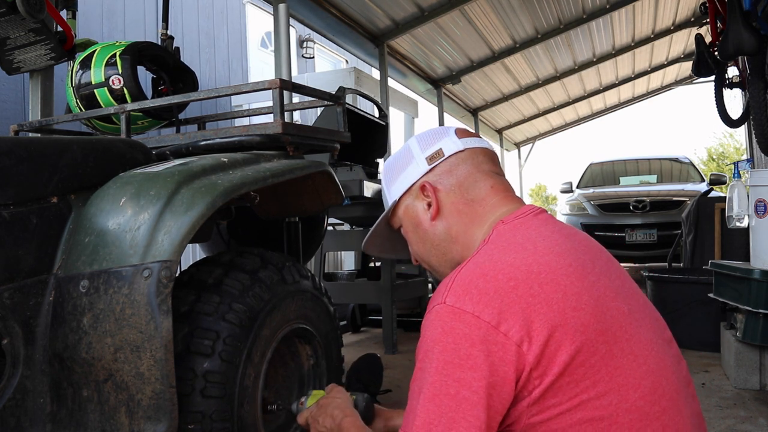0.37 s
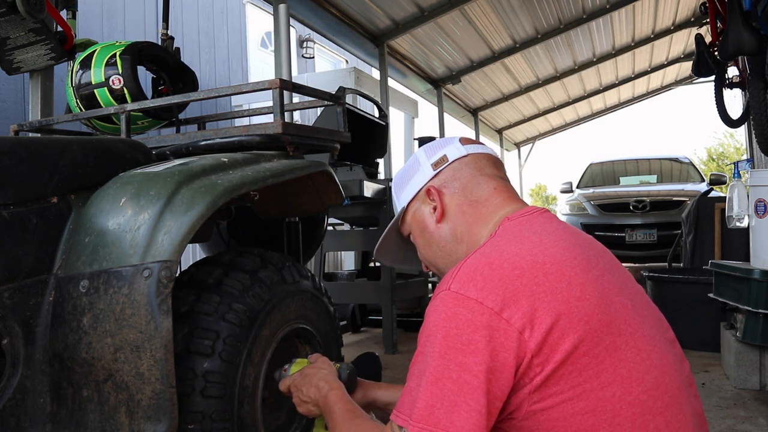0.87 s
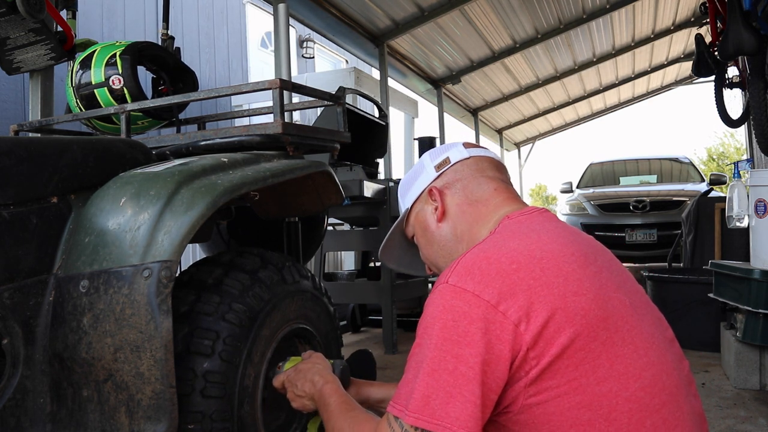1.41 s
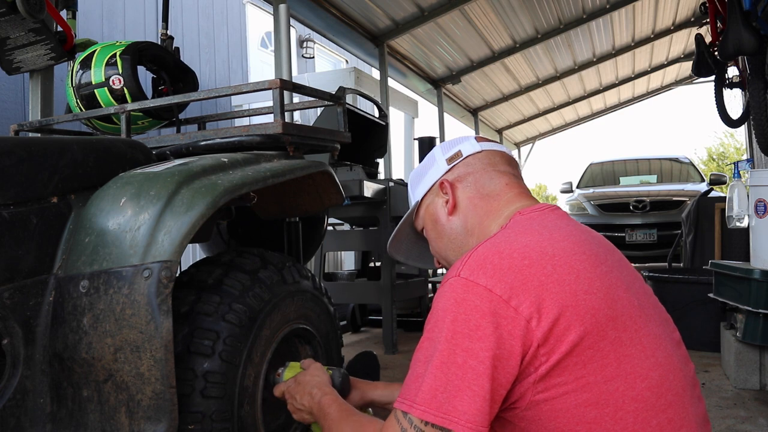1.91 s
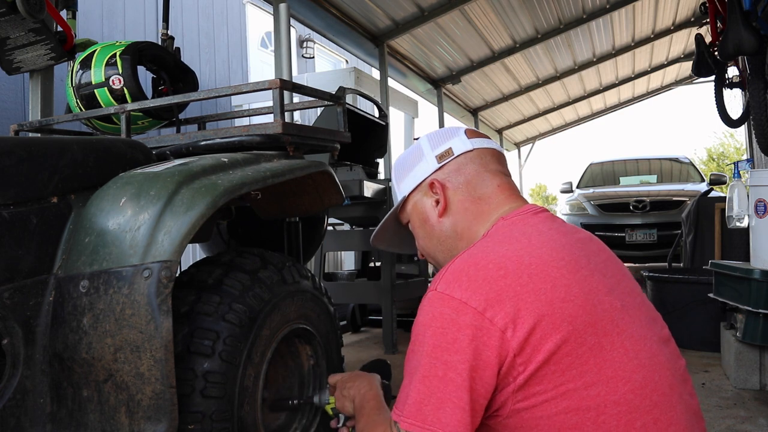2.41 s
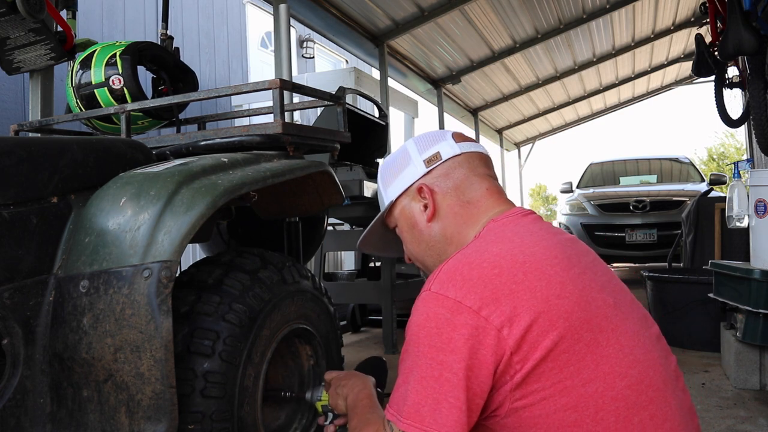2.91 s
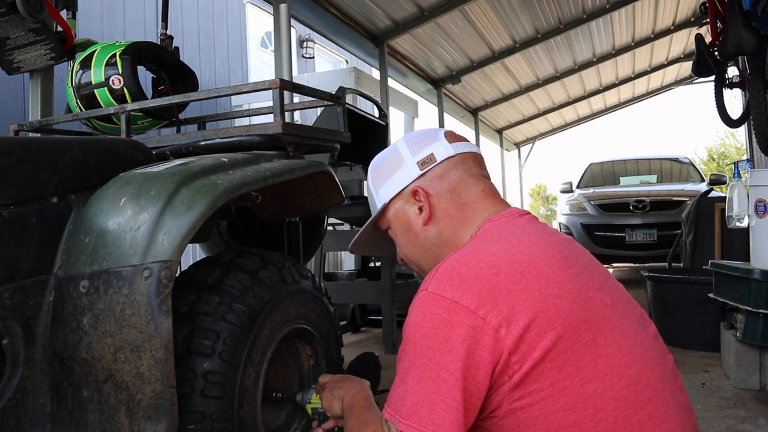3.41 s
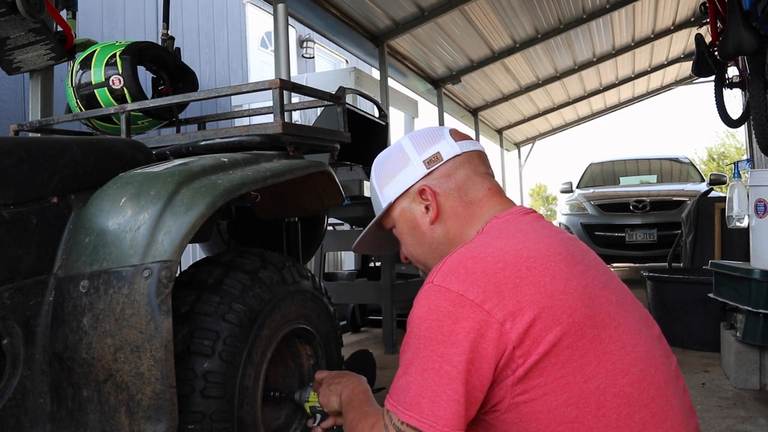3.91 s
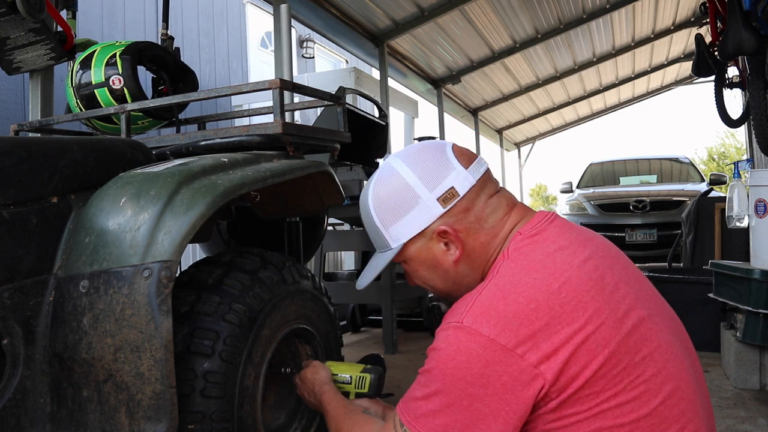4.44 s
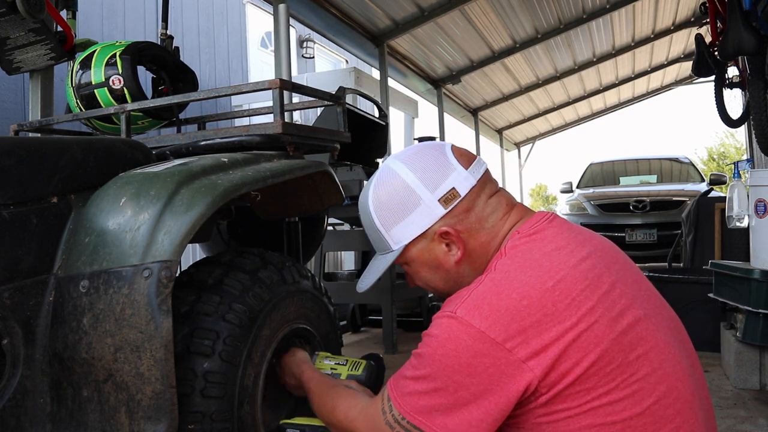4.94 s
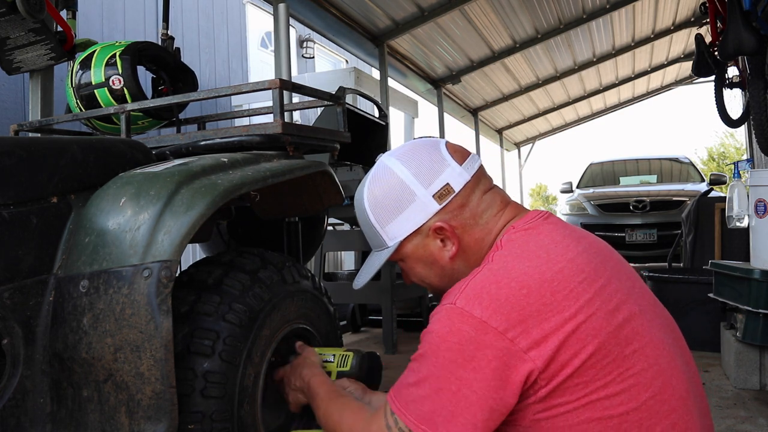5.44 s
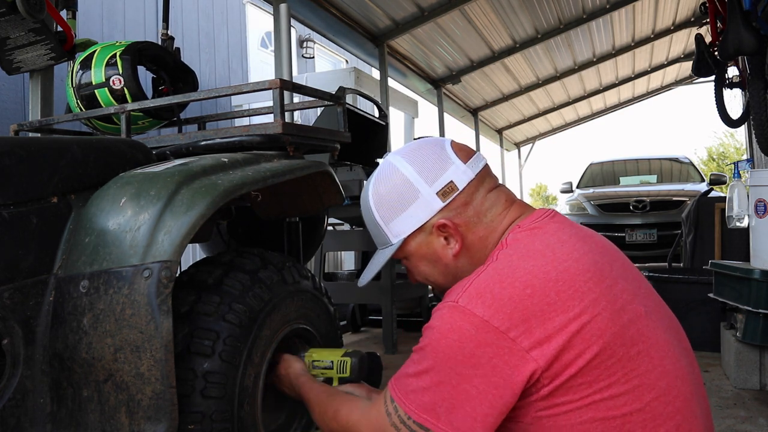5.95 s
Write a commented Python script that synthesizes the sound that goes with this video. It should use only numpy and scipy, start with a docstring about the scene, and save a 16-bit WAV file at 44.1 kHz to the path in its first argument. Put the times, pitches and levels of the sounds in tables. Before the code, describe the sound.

Wheel nuts being tightened under an open carport, heard from close range in stereo. Gear rattle and whirring swell quickly, break into dense steel-on-steel hammering, then stop sharply with a brief coast-down. Between groups of bursts come loose socket taps on nut and rim. Wind softly rumbles at the microphone, with dim far machinery noise and a short roof reverberation.

```python
"""A cordless impact wrench tightens wheel nuts under a sheet-metal carport, close by.
It opens on a short burst of hammer blows over rattling gears; steel socket clicks follow. Three pulls run from
1 s to 1.9 s, three more from 3 s to 4 s and a last one at 5.5 s, with socket clicks between the groups.
Each blow is a short note, ringing modes and noise; the gears are random tooth contacts in three colours.
Beneath lie far machine tones and noise and gusts of filtered wind rumble; the roof echoes in decaying noise."""
import sys
import numpy as np
from scipy import signal
from scipy.fft import rfft, irfft, next_fast_len
from scipy.io import wavfile
from scipy.ndimage import map_coordinates

SR = 44100
rng = np.random.default_rng(int(sys.argv[2]) if len(sys.argv) > 2 else 0)


def field_ratio(decibels):
    """Amplitude ratio for a level in dB (20 dB per decade); scalars and array-likes work."""
    return 10 ** (np.asarray(decibels, dtype=float) / 20)


def master_out(mix):
    """Clip the mix to full scale and print it as 16-bit PCM to the path in sys.argv[1]."""
    frames = np.transpose(np.atleast_2d(mix))
    ceiling = np.clip(frames, -1, 1)
    pcm = np.round(ceiling * 32767).astype(np.int16)
    wavfile.write(sys.argv[1], SR, pcm)


N = 268117  # length in samples


def unit(x):
    """Scale to rms 1."""
    return x / np.sqrt(np.mean(x ** 2) + 1e-20)


def along(points, hz):
    """Read a curve of (Hz, value) points on a log frequency axis."""
    f, v = np.transpose(points)
    return np.interp(np.log(hz + 1), np.log(f + 1), v)


def gain(rows):
    """Gain per sample from (s, dB) points, practically silent outside them."""
    s, db = np.transpose(rows)
    return field_ratio(np.interp(np.arange(N) / SR, s, db, left=-150, right=-150))


def wobble(rate):
    """A smooth random curve with rate knots a second."""
    knots = rng.standard_normal(int(N * rate / SR) + 4)
    return map_coordinates(knots, [np.arange(N) * rate / SR])


def filtered(x, response):
    """Multiply the spectrum of x by a complex response of frequency."""
    m = next_fast_len(x.shape[-1] + 8192)
    return irfft(rfft(x, m) * response(np.fft.rfftfreq(m, 1 / SR)), m)[..., :x.shape[-1]]


# How alike left and right are. Each row: frequency in Hz, likeness from 0 to 1.
LIKENESS = [(40, .978), (200, 1), (1000, 0.96), (2000, 0.95), (3500, 0.67), (5500, 0), (12000, 0)]


def spread(pair, spectrum=((1, 0),)):
    """Colour two unrelated signals by (Hz, dB) and turn them into left and right, alike mostly in the bass."""
    def response(hz):
        angle = np.arccos(np.clip(along(LIKENESS, hz), -1, 1)) / 2
        return field_ratio(along(spectrum, hz)) * [np.cos(angle), np.sin(angle)]

    mid, side = filtered(pair, response)
    return np.array([mid + side, mid - side])


# Low rumble of gusts at the microphones. Each row: time in seconds, level in dB before the flutter.
GUSTS = [(0.0, -58), (0.36, -57), (1.34, -46), (1.44, -45), (1.56, -60.5), (2.05, -61.5), (2.25, -58.5),
         (2.88, -52.5), (3.15, -48), (3.49, -44), (3.81, -53.5), (4.0, -61.5), (4.49, -61), (4.67, -55.5),
         (5.4, -53), (5.55, -49), (5.7, -69), (6.08, -56)]
# Colour of that rumble. Each row: frequency in Hz, relative level in dB per Hz.
RUMBLE_COLOUR = [(12, -46.5), (20, -23), (64, -1.5), (172, -9.5), (195, -16.5), (231, -2), (300, -22),
                 (390, -52), (660, -120)]


def wind():
    """Wind stirring the microphones: low noise that swells in gusts and flutters."""
    rumble = unit(spread(rng.standard_normal((2, N)), RUMBLE_COLOUR))
    return gain(GUSTS) * rumble * field_ratio(1.2 * wobble(12))


# Level at which the yard noise is heard: low after bursts, then rising again.
# Each row: time in seconds, level in dB before wavering.
YARD_LEVEL = [(0, -43), (.36, -58), (.62, -58), (.97, -47), (1.98, -66), (2.6, -55.5), (2.88, -49),
              (4.1, -62.5), (4.6, -59), (4.9, -55.5), (5.5, -47.5), (5.95, -60), (6.08, -65)]
# Colour of the far noise. Each row: frequency in Hz, relative level in dB per Hz.
FAR_COLOUR = [(100, -47.5), (170, -13), (236, -10.5), (320, -10), (515, -16), (740, -19.5), (1020, -18.5),
              (1500, -23), (2080, -23.5), (2700, -27), (3050, -31), (5300, -33.5), (5700, -40.5),
              (9300, -42.5), (11500, -66.5), (14000, -101)]
# Tones of far machinery. Each row: frequency in Hz, peak level in dB over the noise's rms before wavering.
MACHINE_TONES = [(54, -13), (231.5, -4), (1868, -21), (2099, -9.5), (2277, -19), (2627, -14)]


def far_yard():
    """Traffic-like noise and machine tones that waver in level, the tones also in phase."""
    t = np.arange(N) / SR
    rush = unit(spread(rng.standard_normal((2, N)), FAR_COLOUR)) * field_ratio(.9 * wobble(14))
    tones = np.zeros(N)
    for hz, db in MACHINE_TONES:
        level = field_ratio(db + 1.8 * wobble(10))
        tones += level * np.sin(2 * np.pi * hz * t + 1.9 * wobble(30))
    return gain(YARD_LEVEL) * (rush + tones)


# How long the echoes last. Each row: frequency in Hz, time to fall 60 dB in seconds.
ROOF_DECAY = [(200, 0.27), (2000, 0.17), (6000, 0.36), (13000, 0.21)]


def roof(x):
    """Roof, wall and slab answer in decaying noise; each third of a second gets a fresh random tail."""
    step, out = SR // 3, np.zeros((2, N + 2 * SR))
    fade = np.hanning(2 * step + 1)[:-1]  # overlapping fades sum to 1
    x = np.pad(x, (step, 2 * step))
    for at in range(0, N + step, step):
        hz, t, z = signal.stft(rng.standard_normal((2, step)), SR, nperseg=256)
        decay = field_ratio(-60 * t / along(ROOF_DECAY, hz)[:, None])
        tail = signal.istft(z * decay, SR, nperseg=256)[1][:, :step]
        tail = tail / np.linalg.norm(tail[0])
        wet = signal.fftconvolve((x[at:][:2 * step] * fade)[None], tail, axes=1)
        out[:, at:at + wet.shape[1]] += wet
    late = step - round(.004 * SR)  # drop the padding, but hold the echoes back by 4 ms
    return spread(out[:, late:late + N])


# Trigger pulls. Each row: press in seconds, let go in seconds, spin-up in seconds before each part's stretch,
# relative level in dB early on, relative level in dB at let-go.
TRIGGER_PULLS = [(0.002, 0.188, 0.0098, -26, -23), (0.99, 1.157, 0.0054, -30.5, -31.5),
                 (1.223, 1.559, 0.029, -25, -22), (1.717, 1.9, 0.016, -26, -28),
                 (3.054, 3.225, .02, -27.5, -27), (3.313, 3.643, 0.024, -22.5, -23),
                 (3.768, 3.989, 0.0083, -20, -29), (5.52, 5.869, .012, -21, -23.5)]


def running(seating_db, over_db, stretch, brake_t60, coast_db, coast_t60, swell_db):
    """Gain of one part of the tool: spin up, hold under load, brake, coast."""
    t, out = np.arange(N) / SR, np.zeros(N)
    for (press, stop, spin, early_db, late_db), seat_db in zip(TRIGGER_PULLS, seating_db):
        held, after = np.clip(t - press, 0, stop - press), np.clip(t - stop, 0, None)
        change_db = late_db - early_db + swell_db
        load_db = early_db + over_db + seat_db + change_db * held / (stop - press)
        spin_up = (1 - np.exp(-held / (spin * stretch))) ** 2
        fall = field_ratio(-60 * after / brake_t60) + field_ratio(coast_db - 60 * after / coast_t60)
        out += field_ratio(load_db) * spin_up * fall
    return out


def chatter(per_second, scatter_db, smooth):
    """Random tooth contacts of uneven strength over a smooth rush, as two unrelated signals."""
    teeth = (rng.random(N) < per_second / SR) * field_ratio(scatter_db * rng.standard_normal(N))
    return unit(teeth * rng.standard_normal((2, N))) + smooth * rng.standard_normal((2, N))


# How the tool is held and seated in each pull. Each row: case drone in dB, hiss in dB, both over their usual level.
SEATING_LEVELS = [(-3.5, 0.5), (-3, -2), (1, -2), (3.5, 3.5), (0, -4), (2.5, -3), (0, 2), (1.5, 2)]
# Colour of the gear rattle. Each row: frequency in Hz, relative level in dB per Hz.
GEAR_COLOUR = [(410, -34), (700, -27.5), (727, -17.5), (1110, -3.5), (1360, -2.5), (1580, -3.5),
               (1930, -3.5), (2330, -1.5), (2970, -5.5), (3320, -5.5), (4520, -13.5), (5290, -26),
               (6500, -30), (8450, -35), (14300, -120)]
# Colour of the case drone. Each row: frequency in Hz, relative level in dB per Hz.
CASE_COLOUR = [(53, -43.5), (90, -16.5), (112, -5), (146, -21.5), (187, -14), (303, -4.5), (330, -6),
               (441, -7.5), (505, -0.5), (612, -5.5), (721, -13.5), (900, -27), (1170, -36.5), (1980, -120)]
# Colour of the hiss. Each row: frequency in Hz, relative level in dB per Hz.
HISS_COLOUR = [(2940, -23.5), (5000, 1), (5340, -3.5), (6050, -2), (6530, -3), (10900, -4.5), (12600, -15),
               (14400, -21), (15600, -45)]


def motor(blow_s):
    """Gears, case and brushes run together; a loose drive makes the rattle and hiss surge."""
    case_db, hiss_db = np.transpose(SEATING_LEVELS)
    gear = running(np.zeros(len(TRIGGER_PULLS)), over_db=-1, stretch=1.5, brake_t60=0.1474,
                   coast_db=-17, coast_t60=0.6756, swell_db=-0.5)
    case = running(case_db, over_db=-11.5, stretch=2, brake_t60=0.16, coast_db=-22.5, coast_t60=1.74, swell_db=-1)
    hiss = running(hiss_db, over_db=-10, stretch=1.4, brake_t60=0.0771, coast_db=-21.5, coast_t60=0.5, swell_db=4)

    # the gears quieten while the hammer flies free before a blow
    slack_db, slack_s = -1.5, 0.005
    t, blow_s = np.arange(N) / SR, np.append(np.sort(blow_s), N)
    until_blow = blow_s[np.searchsorted(blow_s, t)] - t
    surge = field_ratio(1.2 * wobble(70)) * field_ratio(slack_db * np.exp(-(until_blow / slack_s) ** 2))

    teeth = chatter(per_second=2500, scatter_db=1.5, smooth=1.1)
    rattle = gear * surge * unit(spread(teeth, GEAR_COLOUR))
    drone = case * unit(field_ratio(2.2 * wobble(45)) * spread(teeth, CASE_COLOUR))
    return rattle + drone + hiss * surge * unit(spread(teeth, HISS_COLOUR))


def ring(modes, t, damping):
    """Strike decaying sine modes, each at a new random strength, peak 1; damping scales their decay times."""
    hz, db, t60 = np.transpose(modes)[..., None]
    db = db + 4 * rng.standard_normal(hz.shape) - 60 * t / (t60 * damping)
    x = np.sum(field_ratio(db) * np.sin(2 * np.pi * hz * t), axis=0)
    return x / np.max(abs(x))


# Modes of socket and rim. Each row: frequency in Hz, relative level in dB, undamped 60 dB decay in seconds.
STEEL_MODES = [(1016, 4, 0.14), (1315, -14, 0.23), (1820, -14.5, 0.078), (2263, 1.5, 0.11),
               (2472, -16.5, 0.37), (3000, 13, 0.21), (3150, -7.5, 0.82), (3643, 3, 0.31),
               (3780, -10, 0.63), (4510, -5, 0.21)]
# Modes of wheel and tyre. Each row: frequency in Hz, relative level in dB, undamped 60 dB decay in seconds.
WHEEL_MODES = [(317, -16.5, 0.2), (430, -14, 0.076), (513, -4, 0.14), (576, -2.5, 0.093)]


def blows(table, note_db, steel_db, hold, clack_t60, clack_db, crack_t60, knock_db, damping, fizz_db, swell):
    """Each contact: a short note, steel modes, the wheel's slower knock, and grit for clack and treble crack."""
    out, t = np.zeros((5, N + SR)), np.arange(SR // 8) / SR
    for s, db, hz, low_db, high_db in table:
        rise = field_ratio(db) * (1 - np.exp(-t / 0.0006))
        note = field_ratio(note_db - 60 * t / .006) * np.sin(2 * np.pi * hz * t)
        steel = field_ratio(steel_db) * ring(STEEL_MODES, t, hold)
        knock = field_ratio(low_db + knock_db) * ring(WHEEL_MODES, t, damping) * (1 - np.exp(-t / swell))
        grit = rng.standard_normal((2, len(t)))
        clack = field_ratio(clack_db - 60 * t / clack_t60) * grit
        crack = field_ratio(high_db + fizz_db - 60 * t / crack_t60) * grit
        out[:, round(s * SR):][:, :len(t)] += rise * np.array([note + steel + knock, *clack, *crack])
    body, clack, crack = out[0, :N], out[1:3, :N], out[3:, :N]
    return body + spread(clack, GEAR_COLOUR) + spread(crack, HISS_COLOUR)


# Socket touching nut and rim. Each row: start in seconds, relative level in dB, note in Hz,
# wheel knock in relative dB, treble in relative dB.
SOCKET_TOUCHES = [(0.374, -43, 2010, -17, -5), (0.7129, -25.5, 2250, -22, -18.5),
                  (0.7282, -34.5, 2000, -1.5, -16), (0.811, -27, 2300, -19, -8.5),
                  (0.9128, -31.5, 2060, -14, -19.5), (0.9374, -40, 1460, -13, -38),
                  (1.715, -37, 2140, -24, -26), (2.3914, -54.5, 1140, -2.5, -17),
                  (2.7029, -27, 1765, -10, -18.5), (2.796, -41, 1880, -13, -33),
                  (2.8411, -30, 1540, -11, -3), (2.9337, -41, 2100, -3, -36),
                  (3.073, -34.5, 2500, -25, -21), (4.115, -40, 2100, -24, -25.5),
                  (4.13, -39.5, 2510, -26, -28.5), (4.1905, -47.5, 2040, -13, -12),
                  (4.4264, -58, 2110, -12, -18.5), (4.6617, -22.5, 3310, -9.5, -28.5),
                  (5.0668, -30.5, 1620, -0.5, -20), (5.0721, -32.5, 1320, -28, -43),
                  (5.2126, -31.5, 3220, -16, -29), (5.3467, -37.5, 1450, -2, -38),
                  (5.3673, -20, 2470, -1, -29)]


def socket_clicks():
    """Light socket touches, whose steel rattles a little longer than under a hammer blow."""
    return blows(SOCKET_TOUCHES, note_db=12.5, steel_db=-0.5, hold=0.18, clack_t60=0.096, clack_db=7.5,
                 crack_t60=0.099, knock_db=19.5, damping=0.36, fizz_db=6.0, swell=0.0087)


# Hammer blows on the anvil placed by hand, and a faint trigger click at 3.33 s.
# Each row: start in seconds, relative level in dB, note in Hz.
PLACED_STRIKES = [(0.015, -3, 1400), (0.0401, -0.5, 3560), (0.0655, -6.5, 2840), (0.0841, -2.5, 1326),
                  (0.1074, -2.5, 1310), (0.1235, -4.5, 1980), (0.1438, -5, 1350), (0.1847, -10, 2230),
                  (0.193, -4.5, 2160), (1.0019, -16, 1970), (1.109, -11, 1340), (1.4851, 3, 3214),
                  (1.4949, 0.5, 2657), (1.5098, -0.5, 2060), (1.547, -1.5, 3340), (1.5698, -6, 1690),
                  (1.7401, -11.5, 3795), (1.7643, -6, 2700), (1.7874, -4.5, 2760), (1.7988, 0.5, 1490),
                  (1.8877, -11, 1570), (3.0953, -10.5, 2460), (3.1525, -0.5, 2720), (3.3312, -20, 1410),
                  (3.5529, -3.5, 2900), (3.5651, 2.5, 3170), (3.5739, -3, 3170), (3.591, -1, 3975),
                  (3.656, -6.5, 2720), (3.7872, -4, 2410), (3.8071, 0.5, 2780), (3.8511, -6.5, 2700),
                  (3.887, -6, 3040), (3.9071, -6.5, 2700), (3.9474, -5, 2510), (3.9676, -7.5, 2930),
                  (3.993, -15.5, 2920), (5.539, -7, 2057), (5.5656, 4, 3494), (5.5718, -1, 2404),
                  (5.5821, -8.5, 3180), (5.6083, -3, 3160), (5.6244, -5.5, 3485), (5.6883, 0.5, 2472),
                  (5.6971, -6, 2380), (5.7277, -1, 4390), (5.7504, -5.5, 2420), (5.83, -5.5, 2260),
                  (5.8669, -11, 2200)]
# Spells when the nut is tight and the hammer keeps its beat. Each row: start in seconds, end in seconds,
# filling blows in relative dB, wheel knock in relative dB, treble in relative dB.
TIGHT_SPELLS = [(0.001, .21, -10, -21, -27.5), (1.47, 1.59, -10.5, -26.5, -22),
                (1.73, 1.9, -12, -20, -22.5), (3.54, 3.67, -14, -23.5, -16.5), (3.775, 4.01, -11, -20, -20),
                (5.55, 5.89, -6, -20, -21.5)]


def hammering():
    """Softer blows fill the beat between the placed strikes; every strike draws its knock and treble."""
    beat_s, soft_scatter_db, soft_hz = .021, 1, 2200
    rows = list(PLACED_STRIKES)
    for (s, *_), (later, *_) in zip(PLACED_STRIKES, PLACED_STRIKES[1:]):
        beats = max(round((later - s) / beat_s), 1)
        for start, end, soft_db, *_ in TIGHT_SPELLS:
            if not (start <= s and later <= end):
                continue
            for at in np.linspace(s, later, beats + 1)[1:-1]:
                slip, size, pitch = rng.standard_normal(3)
                rows.append((at + .0015 * slip, soft_db + soft_scatter_db * size, soft_hz * np.exp(.3 * pitch)))

    s, db, hz = np.transpose(rows)
    low, high = rng.standard_normal((len(s), 2)).T
    spell = [(start <= s) & (s <= end) for start, end, *_ in TIGHT_SPELLS]
    # outside the spells knock and treble sit at fixed levels: -33 and -25.5 dB
    knock_db = np.select(spell, [knock for *_, knock, _ in TIGHT_SPELLS], -33)
    treble_db = np.select(spell, [treble for *_, treble in TIGHT_SPELLS], -25.5)
    # louder strikes gain less knock and treble: 0.6 and 0.17 dB lost per dB
    knock_db = knock_db - .6 * db + 3.5 * low
    treble_db = treble_db - 0.17 * db + 5 * high
    return np.transpose([s, db, hz, knock_db, treble_db])


def hammer_blows(strikes):
    """Hard steel on steel, damped at once by the seated nut."""
    return blows(strikes, note_db=4.0, steel_db=-4.0, hold=.1, clack_t60=0.022, clack_db=3.5,
                 crack_t60=0.032, knock_db=8, damping=0.24, fizz_db=10.5, swell=0.0033)


def scene():
    """Mix tool, echoes and yard; the small tool and the wheel radiate no deep bass."""
    strikes = hammering()
    run = motor(strikes[:, 0])
    hits = hammer_blows(strikes) + socket_clicks()
    echoes = roof(np.mean(field_ratio(-2.5) * run + field_ratio(-4) * hits, axis=0))
    # three first-order high-passes at 90 Hz
    tool = filtered(run + hits + echoes, lambda hz: (1j * hz / (90 + 1j * hz)) ** 3)
    return tool + wind() + far_yard()


def low_pass(x):
    """Removes everything above the highest recorded frequency."""
    return signal.sosfilt(signal.butter(12, 15730, fs=SR, output="sos"), x)


def record(dry):
    """Round off the loudest peaks smoothly below full scale."""
    mix = dry / (1 + abs(dry) ** 8) ** (1 / 8)
    return low_pass(mix)


dry = scene()
out = record(dry)
master_out(out)
```